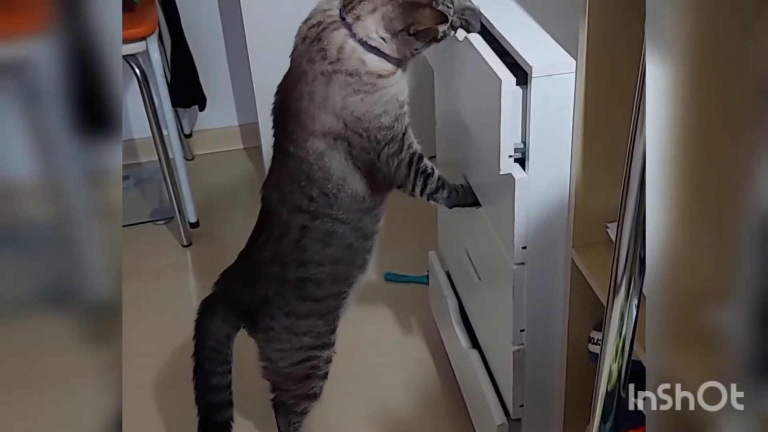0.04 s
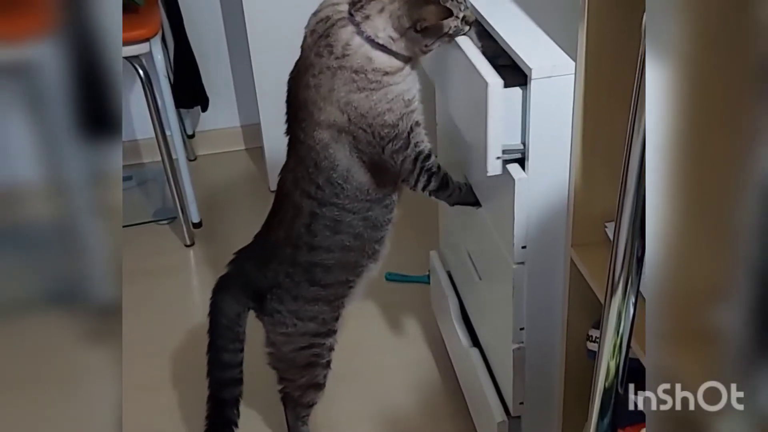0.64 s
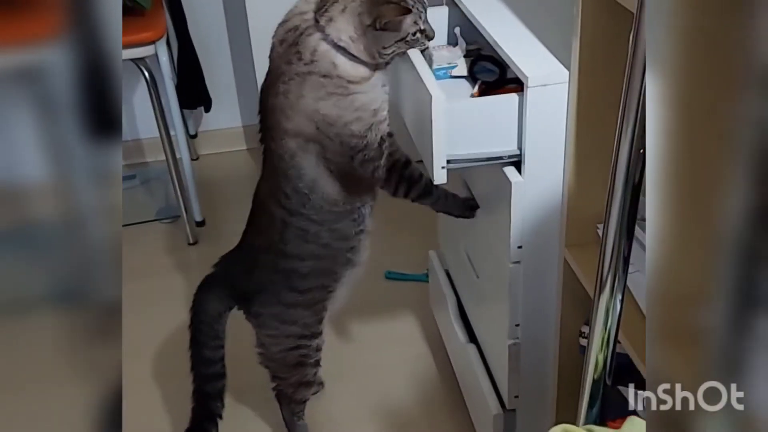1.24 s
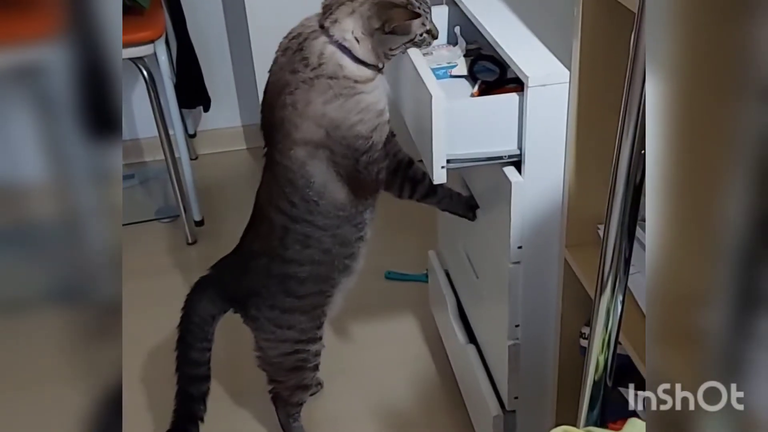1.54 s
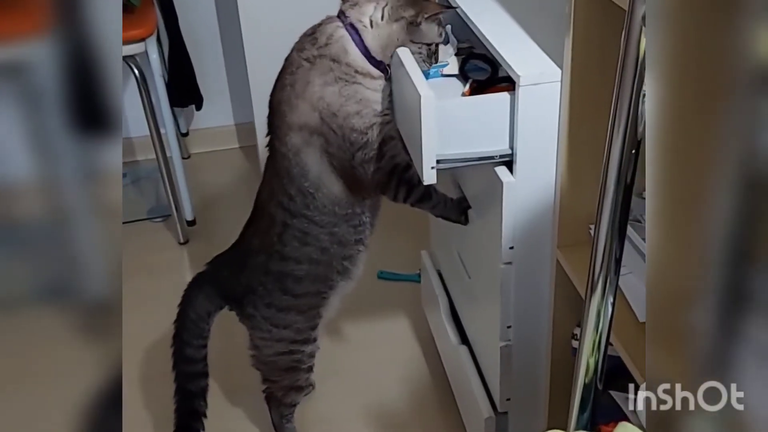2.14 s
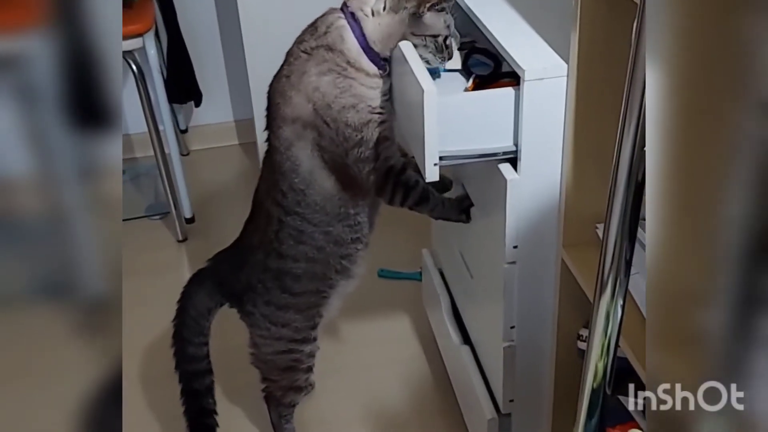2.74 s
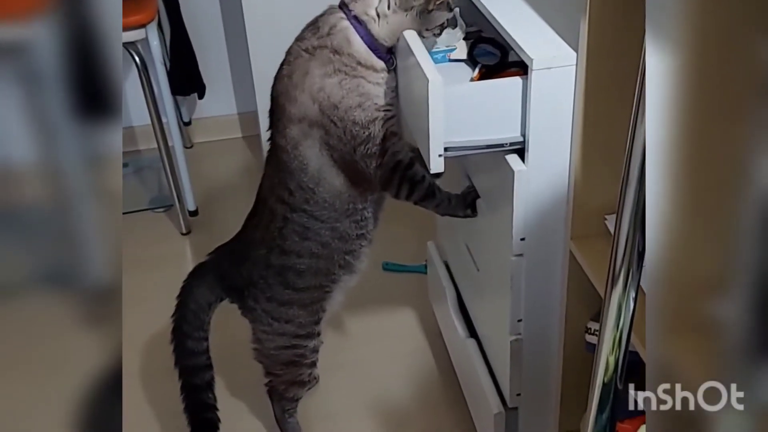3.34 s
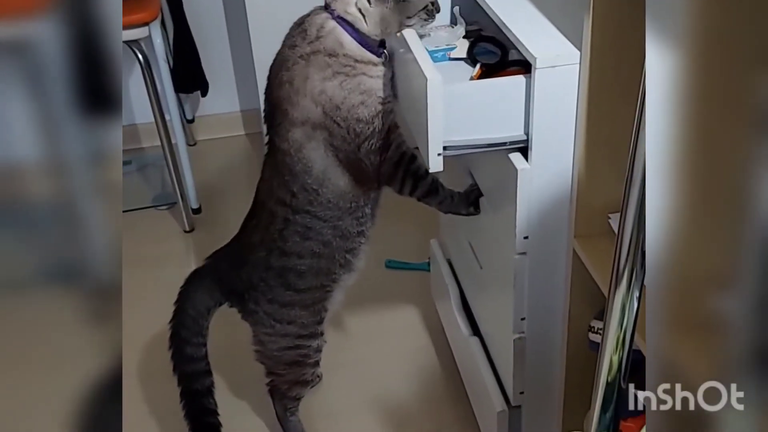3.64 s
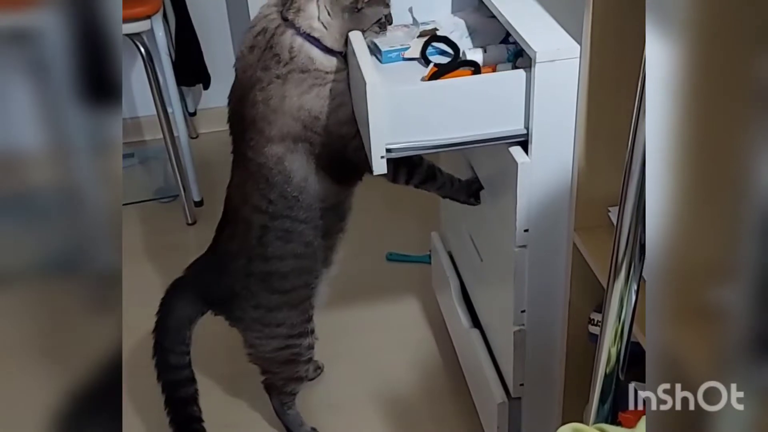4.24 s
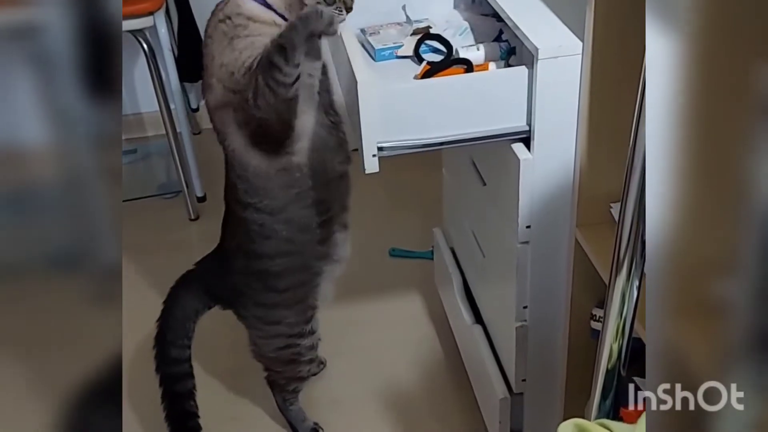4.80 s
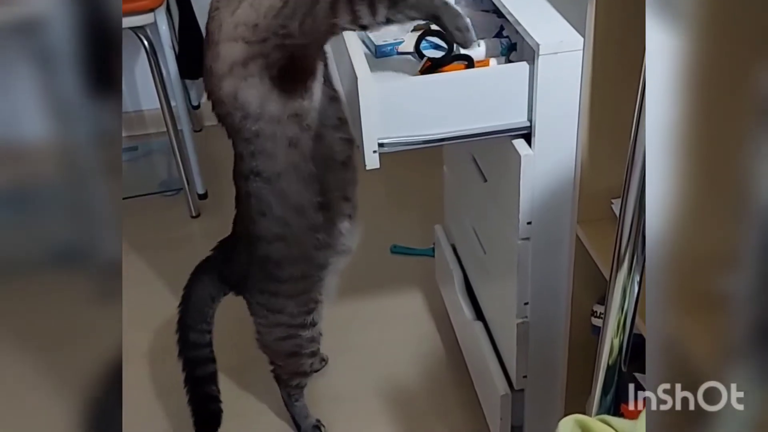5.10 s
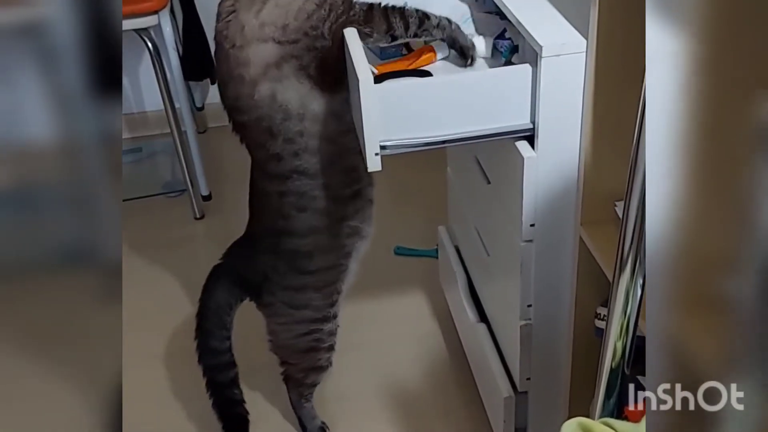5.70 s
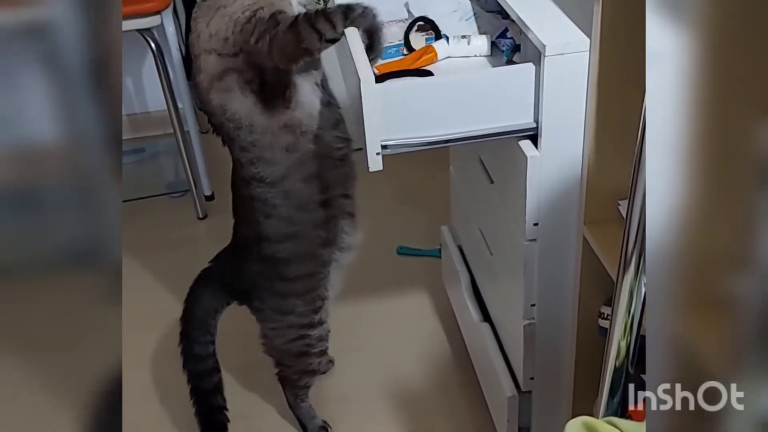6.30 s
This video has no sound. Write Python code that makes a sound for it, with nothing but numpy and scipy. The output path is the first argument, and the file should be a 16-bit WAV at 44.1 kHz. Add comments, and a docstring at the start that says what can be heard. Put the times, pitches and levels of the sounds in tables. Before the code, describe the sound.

In a small, quiet room, a cat tugs a chipboard drawer open. The steel runners tick and rumble briefly, and the loose drawer knocks several times with a hollow boom from the cabinet. After another short roll, a paw rummages inside, making plastic things clatter and scrape on the thin bottom. A soft hiss and low drone lie underneath, all heard from nearby.

```python
"""In a small, quiet room, a cat tugs open the drawer of a chipboard cabinet.
The steel runners tick, ping and rumble as they roll. The loose drawer knocks against its stops
or is bumped by a paw, and the cabinet booms. Then a paw rummages inside: plastic things clatter
and scrape on the thin drawer bottom. Under it all lie a soft hiss, a low drone and the cabinet
murmuring under the cat."""
import sys
import numpy as np
from scipy import signal
from scipy.fft import rfft, irfft
from scipy.io import wavfile

SR = 44100
rng = np.random.default_rng(int(sys.argv[2]) if len(sys.argv) > 2 else 0)


def store_pcm(level_fs):
    """Save levels as 16-bit WAV."""
    pcm = np.round(np.clip(level_fs, -1, 1) * 32767).astype(np.int16)
    wavfile.write(sys.argv[1], SR, np.atleast_2d(pcm).T)


N = 289296
TIME = np.arange(N) / SR
SIZE = 32768  # samples set aside for one short sound
HZ, T = np.fft.rfftfreq(SIZE, 1 / SR), np.arange(SIZE) / SR

# What happens when. The functions below add their own offsets to these levels.
# the cat shifts its weight: start_s, length_s, level_db
WEIGHT_SHIFTS = [(-0.1, 1, -62.5), (1.35, 0.73, -78.5), (2.01, 0.8, -68), (3.94, 0.46, -62),
                 (5.903, 0.73, -63)]
# the steel runners tick: start_s, tick_db, ping_db
RUNNER_TICKS = [(0.557, -66.5, -79), (0.8593, -48.5, -73), (1.0003, -66, -70), (1.833, -58.5, -60.5),
                (2.0388, -56.5, -85), (2.2128, -77, -71), (3.0917, -82, -73), (3.7, -55, -73),
                (3.7428, -64.5, -55), (3.8715, -40.5, -83)]
# each tug rolls the drawer a little way: start_s, length_s, rumble_db, grit_db
TUGS = [(0.562, 0.25, -45.5, -67.5), (0.739, 0.4, -45.5, -55.5), (3.711, 0.26, -43.5, -53.5),
        (4.085, 0.096, -48, -69), (4.289, 0.072, -40.5, -65)]
# the loose drawer knocks or a paw bumps it: start_s, crack_db, panel_db, boom_db, pitch_hz
DRAWER_KNOCKS = [(0.682, -58.5, -54, -40.5, 570), (1.08, -53.5, -43, -47.5, 980),
                 (1.276, -32.5, -42.5, -43, 622), (2.14, -97, -61.5, -53, 320),
                 (2.62, -31.5, -42, -39.5, 710), (2.644, -36, -43, -47, 390), (2.758, -52.5, -59, -53, 578),
                 (3.2271, -47.5, -56, -50.5, 822), (3.268, -53, -56.5, -45.5, 314),
                 (3.743, -50.5, -49, -51, 298), (3.808, -41.5, -43, -39.5, 366),
                 (3.902, -56, -39.5, -42, 399), (4.089, -60, -62, -62, 373),
                 (4.108, -69, -55.5, -52.5, 377), (4.313, -53.5, -46, -61, 593),
                 (4.5996, -61.5, -60, -66, 542), (4.7666, -69, -67, -66, 594),
                 (5.239, -45.5, -46.5, -39.5, 400), (6.016, -61, -55.5, -61.5, 390)]
# a thing is flicked, then lands: start_s, click_db, landing_db, brightness_db_per_octave, fall_s
FLICKS = [(5.2236, -44, -48.5, -13.5, 0.0034), (5.2966, -31, -29.5, -6, 0.0088),
          (5.3281, -31, -32.5, 2.5, 0.0054), (5.3603, -62, -34, 4, 0.0053), (5.403, -35, -29, 4, 0),
          (5.5396, -48.5, -36.5, 2, 0), (5.608, -35.5, -46.5, 1, 0.0011), (5.7124, -44, -37, 6.5, 0.01),
          (5.755, -39, -49, 4.5, 0.012), (5.865, -41, -35.5, -3, 0), (5.924, -50.5, -75, 10.5, 0),
          (6.163, -43.5, -56.5, 1.5, 0.022), (6.523, -40.5, -41, -9, 0.0097), (6.545, -45, -36.5, 4, 0)]
# the paw drags things about: start_s, length_s, rub_db, scratch_db
PAW_STROKES = [(5.23, 0.23, -34, -39), (5.476, 0.16, -45.5, -49), (5.652, 0.15, -42.5, -51),
               (5.79, 0.14, -51.5, -70), (6.488, 0.12, -37.5, -47)]

# The notes each object rings with: pitch_hz, level_db, fade_s (time to fall by 60 dB)
CABINET_NOTES = [(98, -0.5, 0.05), (115.93, 7.5, 0.3), (136.4, -6, 0.57), (156.2, -11, 0.47),
                 (187.4, -10, 0.48)]
RUNNER_NOTES = [(925, -8, 0.23), (1527, 7.5, 0.031), (2510, 3, 0.068), (2550, 3, 0.015), (4120, -6, 0.022)]
PLASTIC_NOTES = [(3044, 1.5, 0.034), (3547, -0.5, 0.068), (3714, 0.5, 0.044), (3934, -0.5, 0.05),
                 (5350, 2.5, 0.016)]
# pitches that the drawer's panels boost: pitch_hz, width_hz, boost_db
PANEL_PEAKS = [(187.8, 9, 6.5), (407.8, 17, 6), (528, 25, 5.5), (572, 27, 7.5), (734, 38, 5.5),
               (891, 9.5, 5.5), (976, 42, 0.5), (1258, 99, 5.5)]

# The tone of each sound, or how strong it is from bass to treble: pitch_hz, level_db
AIR_TONE = [(30, -5.5), (120, -8.5), (170, -16.5), (270, -9.5), (420, -20), (1100, -25.5), (1600, -33),
            (5500, -44.5), (7500, -36.5), (10000, -40.5), (15000, -41.5)]
TICK_TONE = [(400, -18), (1000, 2), (4800, 0), (6000, -7), (8200, -6.5), (10500, -20.5), (16000, -61)]
RUMBLE_TONE = [(60, -30.5), (120, 4), (170, -5.5), (240, -4.5), (400, -14), (700, -22.5), (1400, -38.5),
               (4000, -55.5)]
CRACK_TONE = [(300, -40), (1000, -9), (1700, -2.5), (4000, 0.5), (5600, -5), (6300, -4.5), (8500, -12),
              (11000, -21), (16000, -42)]
PANEL_TONE = [(60, -23.5), (170, -0.5), (330, 3.5), (600, 1), (1250, -4.5), (2000, -12.5), (9000, -106)]
CLICK_TONE = [(400, -20.5), (1500, 2.5), (3800, 0.5), (5500, -2.5), (6500, -3.5), (9000, -7.5),
              (12000, -12), (16000, -20.5)]
RUB_TONE = [(60, -11), (120, 8.5), (220, -10), (600, -12), (1300, -13.5), (6000, -58)]

# how long the room echoes: pitch_hz, fade_s
ROOM_FADE = [(80, 0.41), (250, 0.31), (700, 0.23), (2000, 0.22), (5000, 0.25), (14000, 0.2)]
# how alike the left and right sides are: pitch_hz, likeness (1 means identical)
STEREO_LIKENESS = [(60, 1), (150, 0.93), (350, 0.68), (700, 0.37), (1500, 0.14)]
# the bass leans right, and each sound takes a share of this lean: pitch_hz, left_minus_right_db
BASS_LEAN = [(60, -12.5), (200, -8), (700, -5), (2400, 0)]


def gain_of(db):
    """Turns decibels into a number to multiply by."""
    return 10 ** (np.asarray(db) / 20)


def unit_level(x, size=None):
    """Scales a sound so that its first size samples have an average (rms) level of 1."""
    return x / np.sqrt(np.mean(x[..., :size] ** 2) + 1e-20)


def curve(points, hz=HZ):
    """Joins a table's points with straight lines, giving each octave equal space."""
    pitch_hz, value = np.transpose(points)
    return np.interp(np.log(hz + 1), np.log(pitch_hz + 1), value)


def add(mix, start_s, sound):
    """Mixes in a stereo sound at the given time."""
    part = mix[:, round(start_s * SR):][:, :SIZE]
    part += sound[:, :part.shape[1]]


def through(x, response):
    """Sends a sound through an object or a room (convolution), keeping its length."""
    return signal.fftconvolve(np.atleast_2d(x), np.atleast_2d(response), axes=1)[:, :x.shape[-1]]


def pulse(tone, peaks=(), tilt_db=0):
    """One click with the given tone and ringing peaks, tilted by tilt_db per octave above 1 kHz."""
    db = curve(tone) + tilt_db * np.log2(np.maximum(HZ, 1000) / 3000)
    db += sum(boost / (1 + (2 * (HZ - hz) / width) ** 2) for hz, width, boost in peaks)
    log_gain = np.log(gain_of(np.r_[db, db[-2:0:-1]]))
    spectrum = np.exp(np.conj(signal.hilbert(log_gain)))  # packs the energy at the very start
    return np.fft.ifft(spectrum).real[:SIZE // 4]


def ring(notes):
    """A struck object rings with pure tones that die away."""
    return sum(gain_of(db - 60 * T / fade_s) * np.sin(2 * np.pi * hz * T) for hz, db, fade_s in notes)


def spot_peaks(low_hz, high_hz, boost_db, count=9, damping=0.008):
    """Each struck spot favours a few random pitches: pitch_hz, width_hz, boost_db."""
    place, strength = rng.random((2, count))
    hz = low_hz * (high_hz / low_hz) ** ((np.arange(count) + place) / count)
    return list(zip(hz, damping * hz, boost_db * (0.5 + strength)))


def share_bass(x):
    """Makes two unrelated noises alike in the bass, to form a left and a right side."""
    left, other = rfft(x)
    likeness = np.clip(curve(STEREO_LIKENESS, np.fft.rfftfreq(x.shape[1], 1 / SR)), -1, 1)
    right = likeness * left + np.sqrt(1 - likeness ** 2) * other
    return irfft(np.array([left, right]), x.shape[1])


def lean_right(x, share):
    """Makes low sounds stronger on the right."""
    half_db = share * curve(BASS_LEAN, np.fft.rfftfreq(2 * N, 1 / SR)) / 2
    return irfft(rfft(x, 2 * N) * gain_of([half_db, -half_db]))[:, :N]


def room(direct_db, build_s=0.032, echoes_per_s=5000):
    """The path from one spot to the listener: direct sound, then echoes that pile up and fade."""
    echoes = share_bass(rng.standard_normal((2, SIZE)) * (rng.random((2, SIZE)) < echoes_per_s / SR))
    hz, t, spectrum = signal.stft(echoes, SR, nperseg=256)
    fade_db = -60 * (np.hypot(t, build_s) - build_s) / curve(ROOM_FADE, hz)[:, None]
    path = signal.istft(spectrum * gain_of(fade_db), SR, nperseg=256)[1][:, :SIZE]
    path *= 1 - np.exp(-T / 0.00033)
    path /= np.linalg.norm(path, axis=1, keepdims=True)
    path[:, 0] += gain_of(direct_db)
    return path


def heard(path, sound, db):
    """A hit carried across the room, set to level db over about its first 40 ms."""
    return gain_of(db) * unit_level(through(path, sound), size=1800)


def strokes(starts, lengths, levels_db, power):
    """In each stroke the speed rises and falls in one arch; loudness is speed raised to power."""
    return sum(gain_of(db) * np.maximum(np.sin(np.pi * np.clip((TIME - s) / length, 0, 1)), 0) ** power
               for s, length, db in zip(starts, lengths, levels_db))


def friction(effort, body, slips_per_s, spread_db):
    """Countless tiny slips of uneven size shake an object, and the room echoes them."""
    slips = rng.standard_normal(N) * (rng.random(N) < slips_per_s / SR)
    slips *= gain_of(spread_db * np.minimum(rng.exponential(1, N), 4))
    response = through(room(-7.0, build_s=0.019), body)
    return through(unit_level(slips) * effort, response / np.linalg.norm(response[0]))


def background(air_db=-67.5, drone_hz=57.6, drone_width_hz=7, drone_db=-63.5, still_db=-70):
    """Airy hiss, a wavering low drone, and the cabinet murmuring more as the cat shifts its weight."""
    hz = np.fft.rfftfreq(N, 1 / SR)
    air, drone, murmur = (share_bass(rng.standard_normal((2, N))) for _ in range(3))
    air = unit_level(irfft(rfft(air) * gain_of(curve(AIR_TONE, hz)), N))
    drone = unit_level(irfft(rfft(drone) / (1 + ((hz - drone_hz) / drone_width_hz) ** 2), N))
    movement = gain_of(still_db) + strokes(*np.transpose(WEIGHT_SHIFTS), power=0.58)
    murmur = unit_level(through(murmur, ring(CABINET_NOTES))) * movement
    return gain_of(air_db) * air + gain_of(drone_db) * drone + murmur


def runner_ticks():
    """A steel runner shifts in its rail with a tick and a ping."""
    out = np.zeros((2, N))
    tick, ping = pulse(TICK_TONE), ring(RUNNER_NOTES)
    for start_s, tick_db, ping_db in RUNNER_TICKS:
        path = room(-16.0)
        add(out, start_s, heard(path, tick, tick_db - 10) + heard(path, ping, ping_db - 4))
    return out


def drawer_rolling():
    """The little balls in the runners rumble into the panels and grind in the rail."""
    start_s, length_s, rumble_db, grit_db = np.transpose(TUGS)
    rolling = strokes(start_s, length_s, rumble_db - 1, power=0.57)
    grinding = strokes(start_s, length_s, grit_db - 2, power=0.99)
    rumble = friction(rolling, pulse(RUMBLE_TONE, PANEL_PEAKS), slips_per_s=760, spread_db=1.0)
    grit = friction(grinding, pulse(TICK_TONE, tilt_db=-4.0), slips_per_s=1200, spread_db=5.5)
    return rumble + grit


def drawer_knocks(swell_s=0.0078, hard_above_db=-35, twist_s=0.008, corner_db=-7):
    """The drawer knocks against its stops or is bumped by a paw: a crack, a hollow note and a boom."""
    out = np.zeros((2, N))
    swell = 1 - np.exp(-(T / swell_s) ** 2)
    boom = unit_level(ring(CABINET_NOTES) * swell, size=3000)
    for start_s, crack_db, panel_db, boom_db, pitch_hz in DRAWER_KNOCKS:
        path = room(-18.0)
        tilt_db = -8 + 0.55 * (crack_db - panel_db)  # a crack that stands out is also brighter
        crack = pulse(CRACK_TONE, spot_peaks(1294, 6170, 5.7), tilt_db)
        panel = pulse(PANEL_TONE, [(pitch_hz, 60, 12), (1.7 * pitch_hz, 60, 9)])  # note and overtone
        corner = heard(room(-12.0), crack, crack_db - 9 + corner_db)
        if crack_db > hard_above_db:  # a hard knock twists the drawer, so one corner touches first
            add(out, start_s, corner)
            start_s += twist_s
        knock = heard(path, crack, crack_db - 9) + heard(path, panel, panel_db - 3)
        add(out, start_s, knock + gain_of(boom_db - 3) * boom)
    return out


def plastic_clatter(direct_db=-12.5, detune=0.027):
    """Plastic things click together, ring briefly, and drop on the drawer bottom."""
    out = np.zeros((2, N))
    for start_s, click_db, landing_db, brightness, fall_s in FLICKS:
        path = room(direct_db + 0.94 * brightness)  # things on top sound brighter and more direct
        landing_path = room(direct_db)
        click = pulse(CLICK_TONE, spot_peaks(1583, 9000, 7.4, damping=0.051), brightness)
        bottom = pulse(PANEL_TONE, PANEL_PEAKS + spot_peaks(354, 1864, 5.7, count=5, damping=0.09))
        # pressed against its neighbours, a thing rings a little differently each time
        plastic = ring([(hz * (1 + detune * rng.uniform(-0.85, 1)), db, fade_s)
                        for hz, db, fade_s in PLASTIC_NOTES])
        ring_db = click_db - 17 + 1.76 * brightness  # brighter hits are harder and ring more
        add(out, start_s, heard(path, click, click_db - 9.5) + heard(path, plastic, ring_db))
        thud = heard(landing_path, bottom, landing_db - 5)
        softer_click = heard(landing_path, click, click_db - 13)
        add(out, start_s + fall_s, thud + softer_click)
    return out


def paw_dragging(claw_delay_share=0.068):
    """Things judder over the drawer bottom; a moment later the claws catch and scratch on plastic."""
    start_s, length_s, rub_db, scratch_db = np.transpose(PAW_STROKES)
    delay_s = claw_delay_share * length_s
    rubbing = strokes(start_s, length_s, rub_db - 4, power=0.93)
    scratching = strokes(start_s + delay_s, length_s - delay_s, scratch_db - 7, power=1.2)
    judder = friction(rubbing, pulse(RUB_TONE, PANEL_PEAKS), slips_per_s=500, spread_db=3)
    claws = friction(scratching, pulse(CLICK_TONE), slips_per_s=400, spread_db=2)
    return judder + claws


def scene():
    """Lays the drawer's sounds over the background; they reach the left side first."""
    left, right = drawer_knocks() + plastic_clatter() + runner_ticks() + drawer_rolling() + paw_dragging()
    right = np.r_[np.zeros(3), right[:-3]]  # three samples late
    return lean_right(np.array([left, right]), share=0.32) + lean_right(background(), share=0.89)


def record(dry, low_cut_hz=42, high_cut_hz=15850):
    """Trims away the deepest bass and the highest treble."""
    low_cut = signal.butter(4, low_cut_hz, "highpass", fs=SR, output="sos")
    high_cut = signal.firwin(511, high_cut_hz, window=("kaiser", 9), fs=SR)
    return signal.oaconvolve(signal.sosfilt(low_cut, dry), high_cut[None], "same")


dry = scene()
out = record(dry)
store_pcm(out)
```